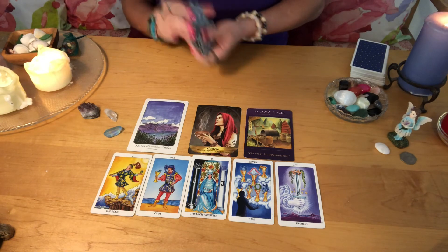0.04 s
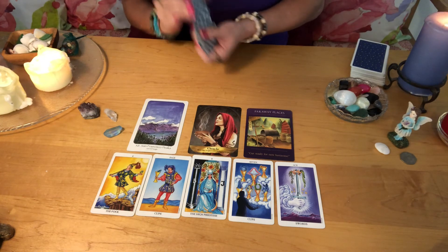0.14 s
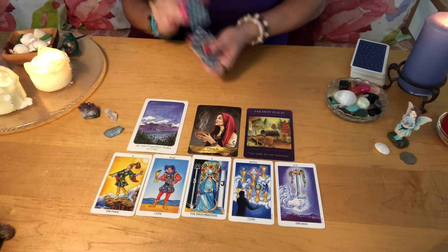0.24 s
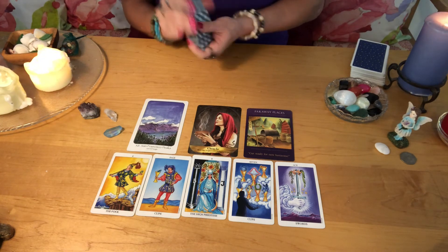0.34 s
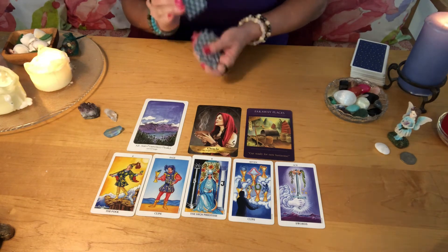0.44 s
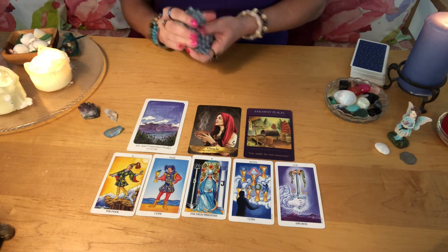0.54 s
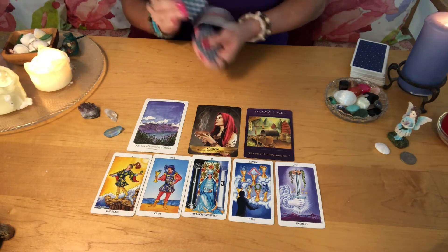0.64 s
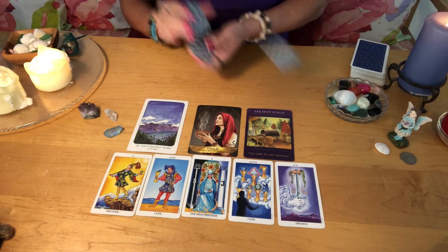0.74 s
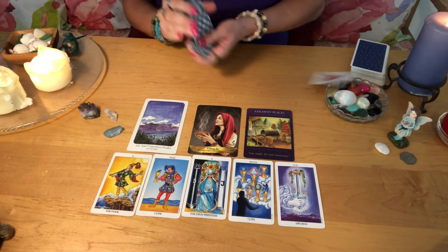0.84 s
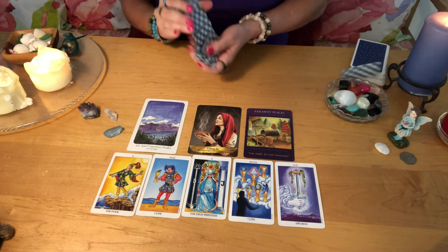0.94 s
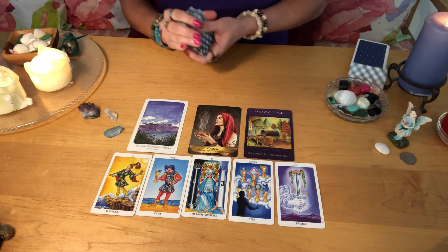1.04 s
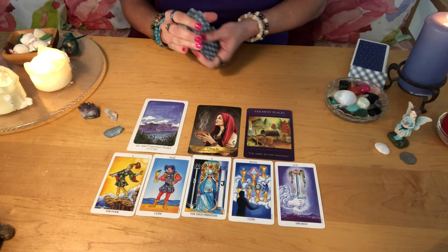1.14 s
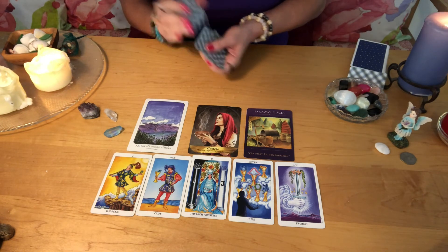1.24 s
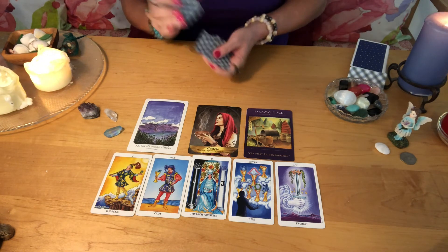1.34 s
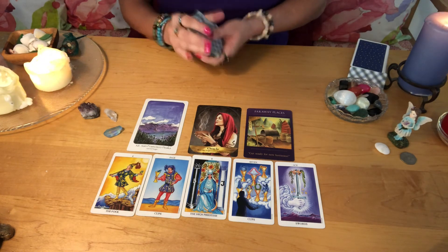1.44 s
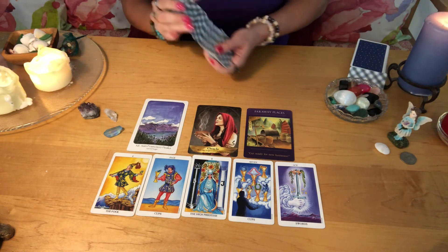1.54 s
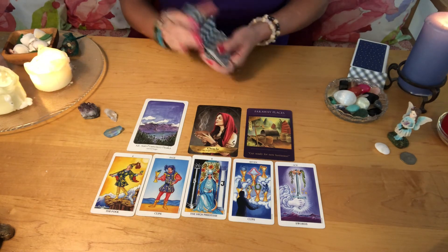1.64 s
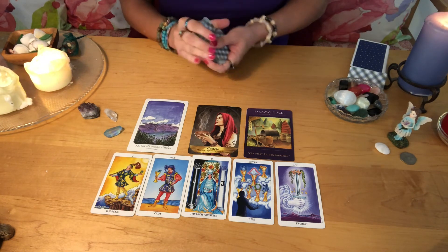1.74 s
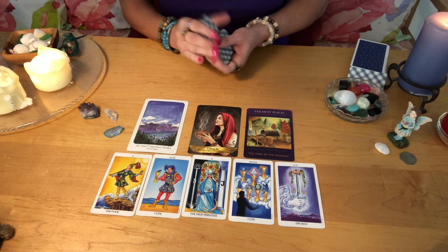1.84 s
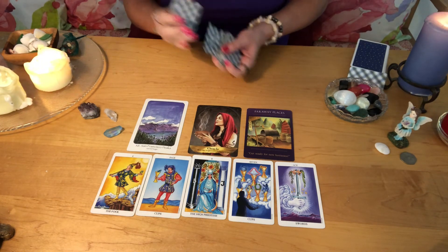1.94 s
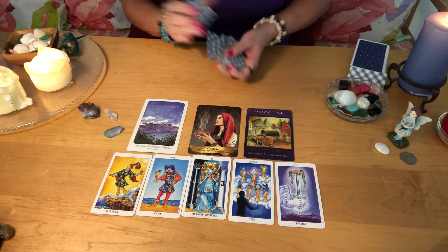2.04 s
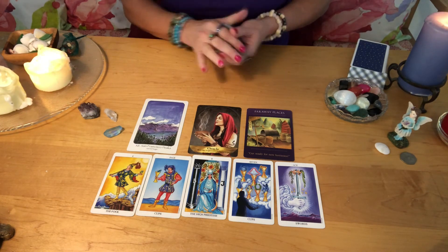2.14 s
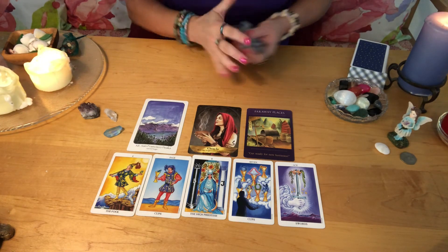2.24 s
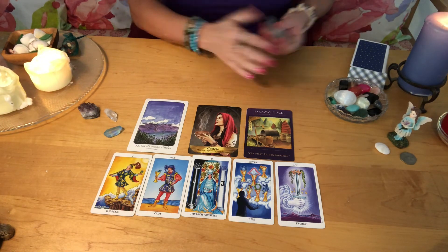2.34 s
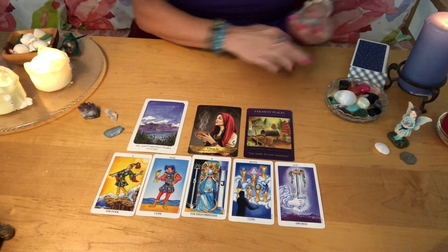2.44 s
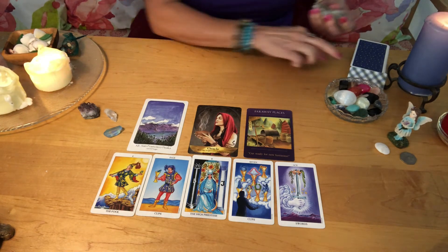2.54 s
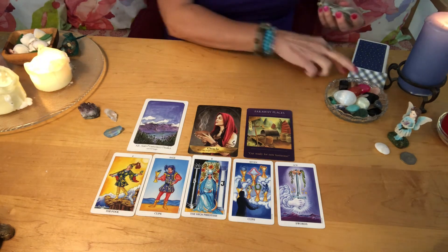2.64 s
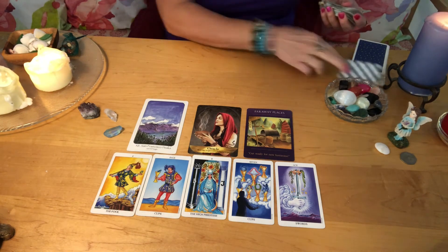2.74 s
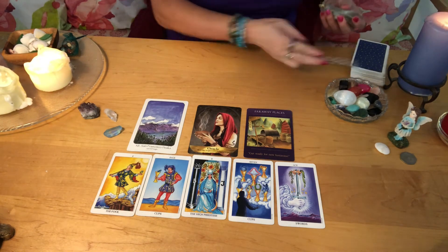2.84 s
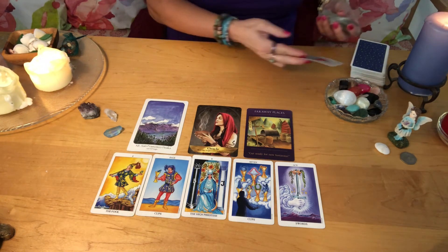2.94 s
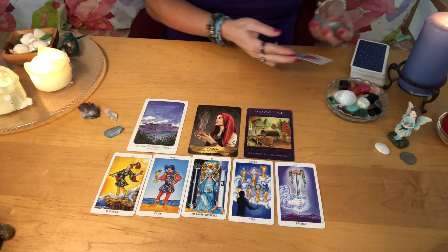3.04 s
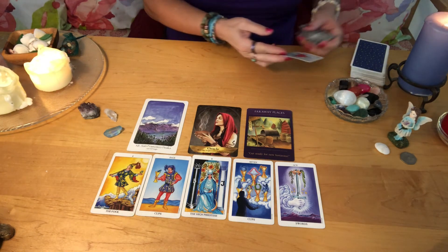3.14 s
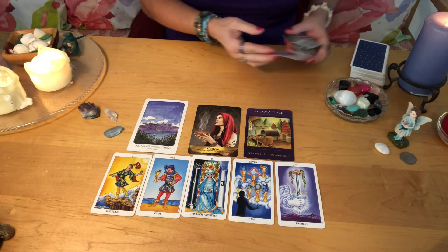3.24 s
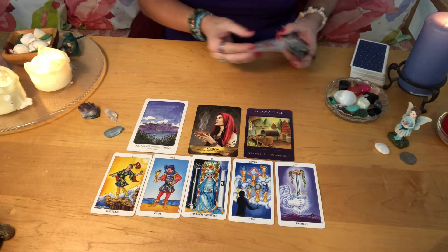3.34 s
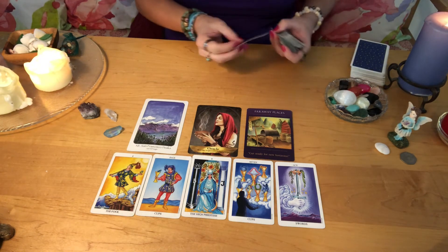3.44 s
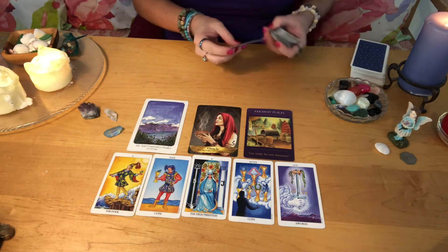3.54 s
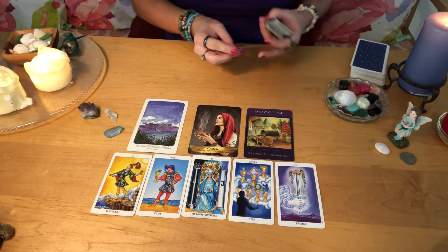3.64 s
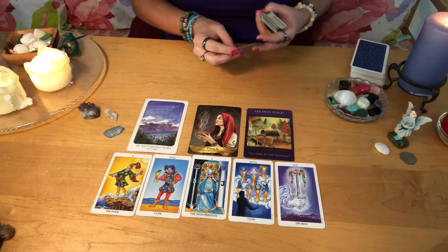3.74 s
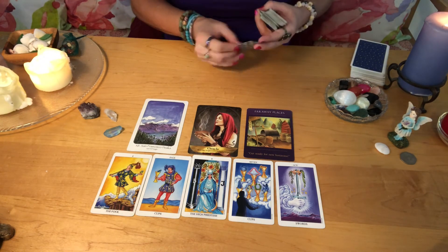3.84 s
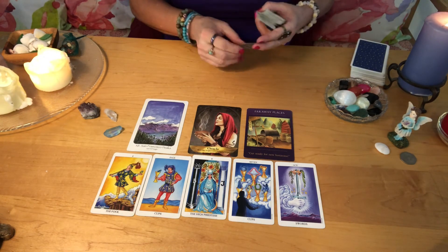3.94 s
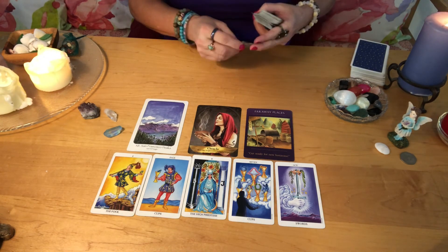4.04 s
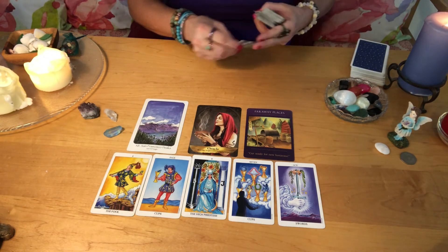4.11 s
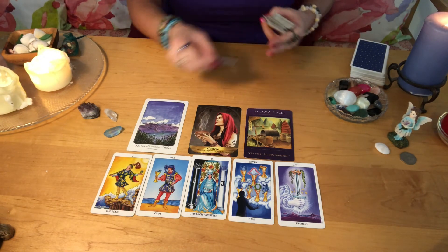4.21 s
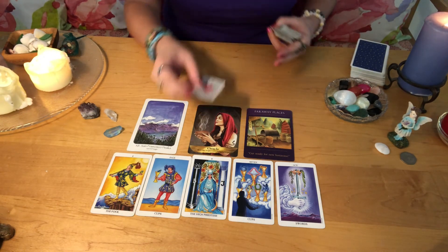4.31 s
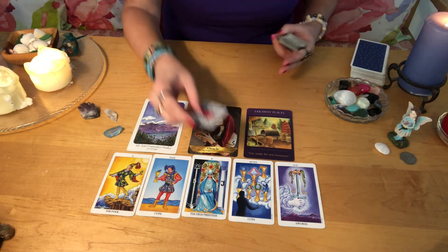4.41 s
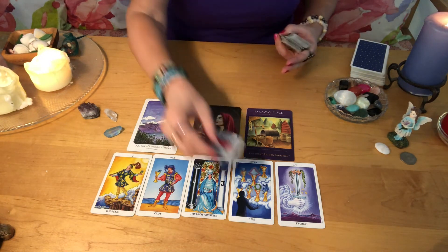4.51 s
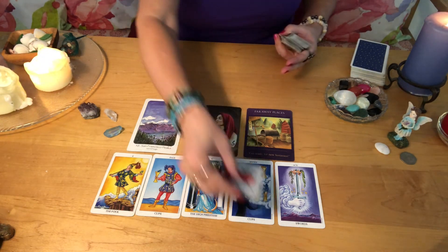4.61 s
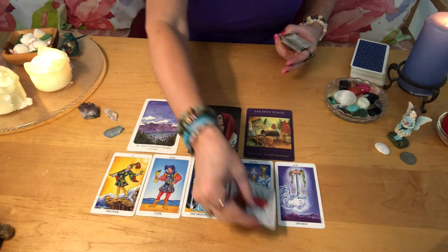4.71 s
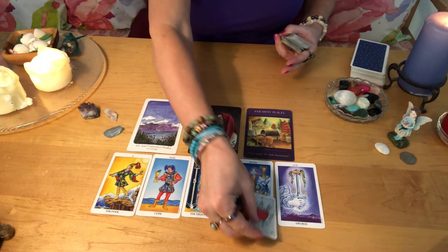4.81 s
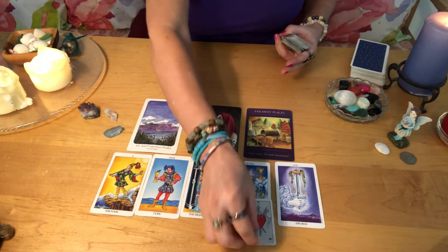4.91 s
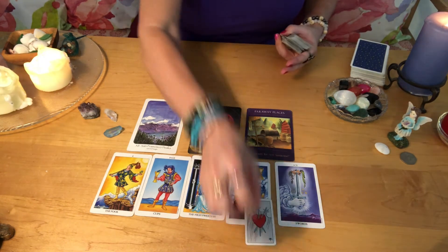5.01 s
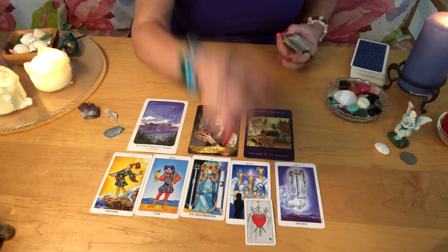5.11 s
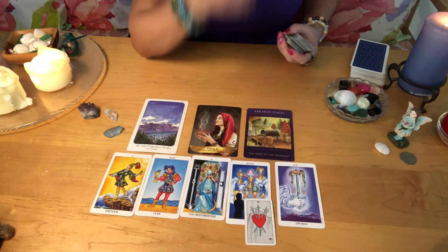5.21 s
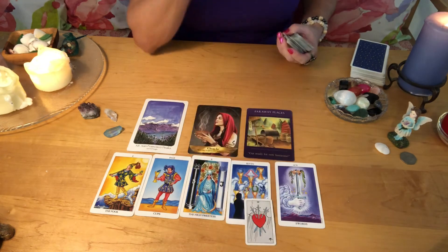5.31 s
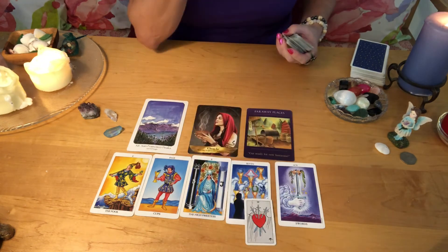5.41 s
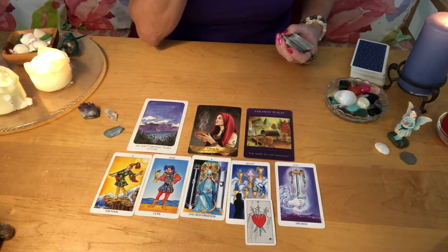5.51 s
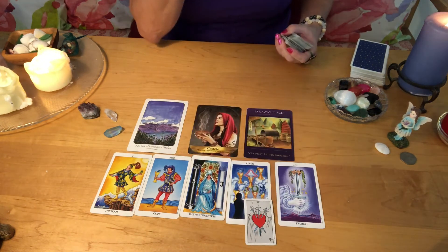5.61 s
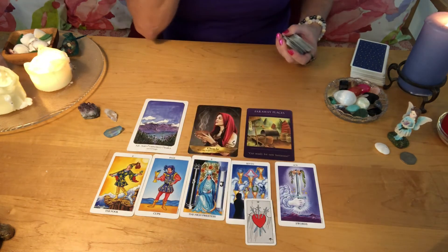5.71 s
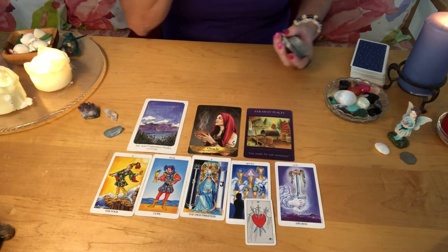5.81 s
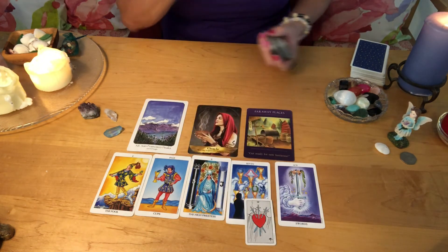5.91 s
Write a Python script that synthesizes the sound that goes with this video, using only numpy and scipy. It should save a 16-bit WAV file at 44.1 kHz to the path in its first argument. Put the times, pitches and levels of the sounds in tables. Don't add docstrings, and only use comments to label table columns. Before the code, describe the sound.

A deck of stiff cards is shuffled overhand in quick papery slaps and slides, then single cards are handled and one snaps sharply indoors.

```python
import sys
import numpy as np
from scipy import signal
from scipy.fft import rfft, irfft, next_fast_len
from scipy.io import wavfile
from scipy.ndimage import uniform_filter1d, map_coordinates

SR = 44100
rng = np.random.default_rng(int(sys.argv[2]) if len(sys.argv) > 2 else 0)


def magnitude_from_level(level_db):
    exponent = np.asarray(level_db, float) / 20
    return 10 ** exponent


def dump_mix(stems):
    frames = np.atleast_2d(stems).T
    limited = np.clip(frames, -1, 1)
    pcm = np.round(limited * 32767).astype(np.int16)
    wavfile.write(sys.argv[1], SR, pcm)


N = 263012


def unit(x):
    return x / np.sqrt(np.mean(x ** 2, axis=-1, keepdims=True) + 1e-20)


def columns(table):
    return np.transpose(table)[:, :, None]


def along(points, hz):
    f, v = np.transpose(points)
    return np.interp(np.log(hz + 1), np.log(f + 1), v)


def wobble(rate):
    knots = rng.standard_normal(int(N * rate / SR) + 4)
    return map_coordinates(knots, [np.arange(N) * rate / SR])


def filtered(x, response):
    m = next_fast_len(x.shape[-1] + SR // 20)
    spectrum = rfft(x, m) * response(np.fft.rfftfreq(m, 1 / SR))
    return irfft(spectrum, m)[..., :x.shape[-1]]


def resonance(f, hz, width_hz):
    return 1j * f * width_hz / (hz * hz - f * f + 1j * f * width_hz)


def burst(rise_ms, fall_ms, spiky_db, colour, snap=0, steep=1.5, size=2048):
    t = (np.arange(size) - size // 2) / SR * 1000
    shape = magnitude_from_level(-8 * np.where(t < 0, np.abs(t / rise_ms) ** steep, t / fall_ms))
    grit = uniform_filter1d(rng.standard_normal(shape.shape), size=25, axis=1) * 5
    push = shape * magnitude_from_level(spiky_db * grit) * rng.standard_normal(shape.shape)
    push += snap * np.linalg.norm(push, axis=1, keepdims=True) * (t == 0)
    z = rfft(push)
    smooth = uniform_filter1d(np.abs(z), size=size // 40, axis=1)
    push = irfft(z / (smooth + 1e-9), size)
    return unit(filtered(push, colour)) * np.sqrt(np.mean(shape ** 2, axis=1, keepdims=True))


def placed(s, rows):
    size = rows.shape[1]
    at = np.round(s * SR).astype(int) + np.arange(size)
    return np.bincount(at.ravel(), rows.ravel(), N + size)[size // 2:][:N]


def edge_tick_db(hz):
    return -12.5 + 6 * np.log2(hz / 3300)


# (frequency [Hz], level [dB])
CARD_RADIATION = [(300, -31), (900, -8.5), (2000, -7.5), (5000, -11.5), (8000, -14), (16000, -28)]


def contact(s, db, hz, thud_db, tick_db, ms):
    s, db, hz, thud_db, tick_db, ms = np.broadcast_arrays(s, db, hz, thud_db, tick_db, ms)

    def flex(f):
        broad = 1.44 * magnitude_from_level(along(CARD_RADIATION, f) + 0.49 * (thud_db + 18.0))
        return resonance(f, hz, 48 * np.sqrt(hz)) ** 2 + broad

    edge = lambda f: resonance(f, 10100, 13000) ** 3
    air_pocket = lambda f: resonance(f, 505, 899) ** 2
    snap = 1.33 * np.exp(-ms / 3)
    card = magnitude_from_level(db - 3) * burst(0.46 * ms, 0.64 * ms, 3.35, flex, snap)
    card += magnitude_from_level(db + tick_db - 2.0) * burst(0.238 * ms, 0.63 * ms, 4.0, edge, 0.4 * snap)
    thud = magnitude_from_level(db + thud_db - 4) * burst(0.34 * ms + 0.19, 0.39 * ms + 1.8, 0.34, air_pocket)
    return placed(s, card) + placed(s + 0.001372, thud)


# (time [s], level [dB], flex resonance [Hz], thud [dB], length [ms])
PACKET_LANDINGS = [(.0587, -32, 2720, -10, 5.2), (.1124, -38.5, 5500, -4.5, 3.9),
                   (.1756, -29, 3500, -4, 4.3), (.2885, -35.5, 2600, -7, 5.9),
                   (.2984, -21.5, 2280, -14.5, 3.3), (.3973, -22, 5250, -7, 3.8),
                   (.5341, -22, 3300, -12, 2.13), (.6388, -23.5, 1180, -6, 2.74),
                   (.7993, -27.5, 3500, -6.5, 1.6), (.817, -29.5, 3130, -8, 5.4),
                   (.8324, -29, 3530, -10.5, 3.6), (.8736, -31.5, 4940, -15, 1.9),
                   (1.243, -34, 1530, -25, 5.4), (1.2482, -26, 3800, -6.5, 2.74),
                   (1.4177, -26.5, 3750, -10, 2.4), (1.6723, -25.5, 3430, -18.5, 2.6),
                   (1.6805, -19, 4470, -26, 1.4), (1.7331, -36.5, 4600, -7, 3.4),
                   (1.744, -38, 4200, 4, 3.2), (1.8332, -41, 3000, -11, 2.6),
                   (1.8959, -34.5, 4250, -10, 8.2), (1.9239, -31, 1660, -3, 3.7),
                   (2.2216, -30, 5500, -6.5, 1.54)]


def landings():
    s, db, hz, thud_db, ms = columns(PACKET_LANDINGS)
    return contact(s, db, hz, thud_db, edge_tick_db(hz), ms)


# (time [s], level [dB], flex resonance [Hz], thud [dB], length [ms])
THUMB_SNAPS = [
    (4.14, -28.5, 4340, -39, 4),
    (4.893, -17, 6800, -30.5, .94),
    (4.8957, -21.5, 6800, -22, 1.8),
    (4.8978, -21.5, 3100, -12.5, 1.8),
    (4.8975, -23.5, 11000, -30.5, 1.4),
    (4.8969, -13.5, 6270, -16.5, 1.53),
]


def snaps():
    s, db, hz, thud_db, ms = columns(THUMB_SNAPS)
    return contact(s, db, hz, thud_db, edge_tick_db(hz), ms)


# (time [s], level [dB], flex resonance [Hz], length [ms])
PACK_SETTLES = [(0.0153, -46, 1160, 17), (0.0673, -39.5, 2250, 7.2), (0.083, -42, 2360, 7.5),
                (0.1893, -50, 3550, 9.1), (0.3399, -41, 3550, 6.5), (0.3751, -43, 3170, 6),
                (0.4113, -35.5, 2730, 7.3), (.653, -41, 1400, 12), (.706, -54, 2360, 11),
                (0.7838, -36, 1980, 17), (.845, -37.5, 2090, 7.3), (.9935, -49, 3430, 4.5),
                (1.042, -49, 2800, 8.8), (1.056, -42.5, 2600, 6.1), (1.0793, -47.5, 2940, 11),
                (1.2173, -48, 3530, 7.5), (1.2608, -45.5, 1200, 10), (1.421, -36, 2600, 5.4),
                (1.4283, -40.5, 1000, 14), (1.44, -44.5, 3000, 16), (1.4711, -45.5, 3840, 6.2),
                (1.689, -32.5, 3340, 13.5), (1.9089, -38.5, 1550, 6.5), (2.1004, -54, 2990, 4.3),
                (2.1095, -46, 2070, 9), (2.1347, -38.5, 2830, 13.5), (2.1793, -50, 2600, 16),
                (2.188, -50, 1190, 11)]


def settles():
    s, db, hz, ms = columns(PACK_SETTLES)
    return contact(s, db, hz, -6, edge_tick_db(hz), ms)


# (time [s], level [dB], flex resonance [Hz], length [ms])
CORNER_FLICKS = [(0.3075, -46, 2230, 4.2), (1.0974, -44, 4000, 6.1), (1.1065, -39, 3620, 7.3),
                 (1.1472, -43.5, 3800, 4.2), (1.1756, -44.5, 4460, 20), (1.193, -44.5, 2480, 16),
                 (1.4987, -56, 4690, 13), (1.645, -47, 5000, 9), (1.6686, -37.5, 2070, 16),
                 (1.8735, -43, 3670, 11), (3.1918, -44.5, 5600, 1.9), (3.2038, -52, 1440, 5),
                 (1.576, -59, 2900, 3), (4.1607, -57, 4460, 4.5), (4.246, -60, 4520, 3.6),
                 (4.7495, -55, 1900, 4.1), (5.8, -61.5, 4000, 6), (5.458, -64, 3400, 2.6),
                 (5.8489, -63, 8850, 4.9)]


def flicks():
    s, db, hz, ms = columns(CORNER_FLICKS)
    return contact(s, db, hz, -20.5, edge_tick_db(hz), ms)


# (time [s], level [dB], flex resonance [Hz], thud [dB], edge tick [dB])
FINGER_TAPS = [(2.6821, -44.5, 2700, -2.1, -21), (2.6896, -47, 2650, -3, -26),
               (2.7029, -44, 3290, -11, -10), (2.746, -40.5, 1480, -3, -4), (3.257, -64, 2050, -15, -18),
               (3.4163, -57, 1320, -2, -8), (3.497, -47.5, 2050, -9, -25), (3.506, -45, 2580, -15, -2.5),
               (3.7899, -52, 3720, 0.5, -11), (3.9986, -64.5, 3400, 6.5, -12), (4.0162, -60, 1222, 2.1, -8),
               (4.0607, -58, 3900, -11, -11), (4.0758, -50.5, 2960, 1.5, -25),
               (4.305, -38.5, 4020, -12, -21), (4.5433, -56.5, 1590, -14.5, -21),
               (4.5528, -59, 6800, -5, -13), (4.9118, -47, 7110, -7.5, -3), (5.41, -57.5, 3340, -10.5, -15)]


def taps():
    s, db, hz, thud_db, tick_db = columns(FINGER_TAPS)
    return contact(s, db, hz, thud_db, tick_db, 3.93)


# (time [s], level [dB], edge tick [dB], length [ms])
NAIL_CLICKS = [
    (1.5566, -56, 2.5, 31),
    (1.337, -65, 1, 14),
    (2.6477, -61, -2.1, 2.5),
    (2.8177, -55, -5, 4.4),
    (2.8327, -44, -1, 1.8),
    (2.9255, -60, 4.5, 1.7),
    (5.1817, -53, 11, 1.8),
    (5.1884, -66, 5, 4),
    (5.2003, -61, 3, 5.7),
    (5.217, -72, 8, 3),
]


def nails():
    s, db, tick_db, ms = columns(NAIL_CLICKS)
    return contact(s, db, 8850, -26, tick_db, ms)


# (landing time [s], level [dB], swell [ms], colour [Hz])
PACKET_SCRAPES = [(0.174, -48, 23, 3870), (.286, -41, 3.8, 3970), (.395, -54, 6.9, 5000),
                  (0.637, -43, 11.6, 4450), (0.777, -36, 3.1, 2540), (1.245, -54.5, 20, 2996),
                  (1.67, -51, 11, 3000), (1.097, -49, 1.8, 4500), (2.102, -53, 1.9, 3000),
                  (4.541, -59, 2, 2940), (1.778, -50.5, 1.1, 11000), (2.132, -46, 9.2, 3680),
                  (2.22, -51, 14, 5000), (2.745, -59, 33, 2980), (4.146, -53.5, 20, 3650),
                  (4.304, -48, 9.5, 3600), (4.875, -54, 39, 4010), (4.892, -47, 14, 6500)]


def scrapes():
    s, db, ms, hz = columns(PACKET_SCRAPES)
    colour = lambda f: resonance(f, hz, 2.5 * hz) ** 2 + 0.049 * resonance(f, 11000, 8100)
    return placed(s, magnitude_from_level(db) * burst(ms, 1.2, 1.6, colour, steep=1.5, size=8192))


# (top time [s], level [dB], fading [dB per 100 ms], body over it [dB], rub resonance [Hz])
RUB_STROKES = [(0.081, -47.5, 12, -9, 2660), (.2, -57.5, 14.5, 1, 3360), (.38, -45.5, 7.5, -5.5, 4000),
               (.49, -47, 7, -6, 3170), (.86, -47, 13.5, -4.5, 3100), (1.11, -60, 1.5, -2, 3630),
               (1.49, -57, 8.5, -17, 3570), (1.71, -47, 12, -2, 3840), (1.87, -58.5, 6.5, -14, 4110),
               (2.18, -54, 11.5, -6, 3200), (3.22, -67, 24.5, -6, 4990), (3.47, -67, 19.5, -2.5, 2330),
               (3.78, -67.5, 5, -9, 3640), (4.08, -66, 6, -2, 4300), (4.35, -70.5, 6.5, -8, 3800),
               (4.55, -61.5, 13.5, 0.5, 2920), (4.94, -48.5, 15.5, -4, 3990), (5.79, -69.5, 14, 1, 3460)]


def strokes():
    swell, rest_db, hiss_db = 1.6, -73, -13
    s, db, fade_db, body_db, hz = columns(RUB_STROKES)
    u = (np.arange(N) / SR - s) * 10
    stroke_db = db - fade_db * np.where(u > 0, u, -swell * u)
    power = magnitude_from_level(2 * np.maximum(stroke_db, -150))
    total = power.sum(0)
    body = (power * magnitude_from_level(2 * body_db)).sum(0) + magnitude_from_level(2 * rest_db)
    rub_db = 10 * np.log10(total)
    return rub_db, 10 * np.log10(body), rub_db + hiss_db, (power * hz).sum(0) / total


def slide():
    rub_db, body_db, hiss_db, hz = strokes()
    clumps = magnitude_from_level(1.5 * wobble(60) + 3 * wobble(400))
    grains = unit(clumps * rng.standard_normal((4, N)))
    broad = unit(filtered(grains[0], lambda f: resonance(f, 3070, 4200) ** 2))
    sway = unit(filtered(grains[1], lambda f: 1 / (1 + (f / 350) ** 2)))
    ring = unit(sway * np.sin(2 * np.pi * np.cumsum(hz) / SR))
    body = unit(filtered(grains[2], lambda f: resonance(f, 775, 1500) ** 2))
    hiss = unit(filtered(grains[3], lambda f: resonance(f, 10330, 12000) ** 3))
    rub = magnitude_from_level(rub_db - 5.0) * (broad + 0.181 * ring)
    return rub + magnitude_from_level(body_db - 3.5) * body + magnitude_from_level(hiss_db - 5.5) * hiss


# (time [s], band centre [Hz], band width [Hz], level [dB], t60 [s])
RINGING_BANDS = [
    (.308, 2190, 600, -44, 0.22),
    (.408, 4500, 500, -51.5, 0.69),
    (.408, 2650, 500, -44.5, 0.3),
    (3.19, 1370, 320, -59, 0.098),
    (4.157, 3400, 400, -64, .35),
    (4.156, 4400, 480, -50, 0.36),
    (4.157, 6230, 900, -66, 0.44),
    (4.157, 7900, 700, -59.5, 0.32),
]


def ringing():
    t = np.arange(N) / SR
    out = np.zeros(N)
    for s, hz, width_hz, db, t60 in RINGING_BANDS:
        u = t - s
        fade = magnitude_from_level(-60 * np.where(u > 0, u / t60, -u / 0.012) + 1.8 * wobble(90))
        band = unit(filtered(rng.standard_normal(N), lambda f: resonance(f, hz, width_hz) ** 2))
        out += magnitude_from_level(db) * fade * band
    return out


# (time [s], level [dB], frequency [Hz], t60 [s])
TABLE_BUMPS = [
    (0.74, -53.5, 198, 0.3),
    (1.92, -64, 70, 0.27),
    (2.43, -44, 253, 0.035),
    (4.4, -58, 155, 0.58),
    (4.4, -51.5, 170, 0.15),
    (3.9, -64, 55, .3),
    (1.7, -60, 46, 0.22),
    (0.38, -50, 290, 0.06),
]


def bumps():
    t = np.arange(N) / SR
    out = np.zeros(N)
    for s, db, hz, t60 in TABLE_BUMPS:
        u = np.maximum(t - s, 0)
        envelope = magnitude_from_level(-60 * u / t60) * (1 - np.exp(-u / 0.0049))
        out += magnitude_from_level(db) * envelope * np.sin(2 * np.pi * hz * u)
    return out


# (frequency [Hz], t60 [s])
ROOM_DECAY = [(200, 0.41), (1500, 0.39), (6000, 0.24), (14000, 0.27)]


def room(x):
    wall_ms, wall_db = 13, -19
    step, lag, smear_length = SR // 70, round(wall_ms * SR / 1000), SR // 200
    hz, t, z = signal.stft(rng.standard_normal((64, SR // 3)), SR, nperseg=256)
    fading = z * magnitude_from_level(-60 * t / along(ROOM_DECAY, hz)[:, None])
    tails = signal.istft(fading, SR, nperseg=256)[1]
    length = tails.shape[1]
    tails = magnitude_from_level(-10) * unit(tails) / np.sqrt(length)
    tails *= 1 - np.exp(-np.arange(length) / (0.014 * SR))
    smear = rng.standard_normal((64, smear_length)) * magnitude_from_level(-60 * np.arange(smear_length) / SR / 0.0037)
    tails[:, lag:lag + smear_length] += magnitude_from_level(wall_db) * unit(smear) / np.sqrt(smear_length)
    out = np.zeros(N + SR)
    for k, start in enumerate(range(0, N, step)):
        wet = signal.fftconvolve(x[start:start + step], tails[k % len(tails)])
        out[start:][:len(wet)] += wet
    return out[:N]


# (frequency [Hz], level [dB per Hz])
AIR_NOISE = [(25, -35.5), (49, -9), (123, 0.5), (206, -3.5), (405, -6), (1160, -26), (5880, -24),
             (16000, -30.5)]
# (frequency [Hz], level [dB])
MAINS_HUM = [(118.4, -72), (236.9, -73.5)]


def air():
    noise = unit(filtered(rng.standard_normal(N), lambda f: magnitude_from_level(along(AIR_NOISE, f))))
    out = magnitude_from_level(-62.5 - 2.5 + 0.54 * wobble(3.68)) * noise
    t = np.arange(N) / SR
    for hz, db in MAINS_HUM:
        level = magnitude_from_level(db - 1 + 2.43 * wobble(6.8))
        out += level * np.sin(2 * np.pi * hz * t + 0.76 * wobble(4.3))
    return out


def scene():
    hits = landings() + snaps() + settles() + flicks() + taps() + nails()
    return (hits + scrapes() + slide() + ringing() + bumps() + room(hits) + air())[None]


def roll_off(x):
    return signal.sosfilt(signal.butter(12, 17140, fs=SR, output="sos"), x)


def record(dry):
    top_hz, skirt_hz = 15850, 16800
    below = lambda f, hz: 0.5 - 0.5 * np.tanh((f - hz) / 60)
    dry = filtered(dry, lambda f: magnitude_from_level(1.42 * np.tanh((8300 - f) / 300) - 2.0))
    skirt = filtered(dry, lambda f: below(f, skirt_hz) - below(f, top_hz))
    power = np.abs(uniform_filter1d(skirt ** 2, size=256))
    gate = magnitude_from_level(-9) * power / (power + magnitude_from_level(-60) ** 2)
    mix = filtered(dry, lambda f: below(f, top_hz)) + gate * skirt
    return roll_off(mix)


dry = scene()
out = record(dry)
dump_mix(out)
```